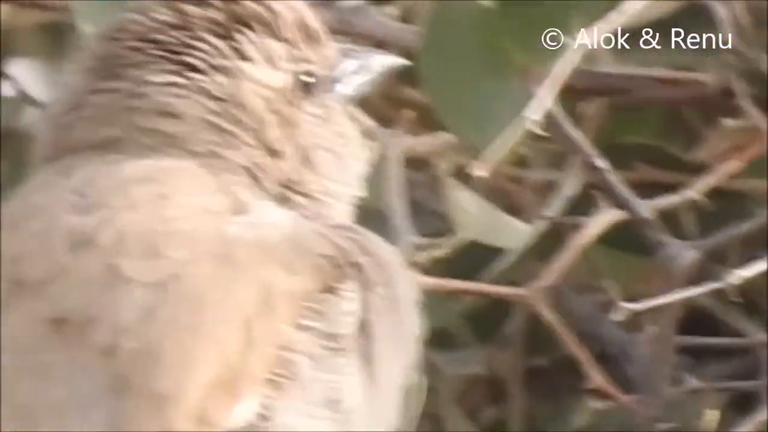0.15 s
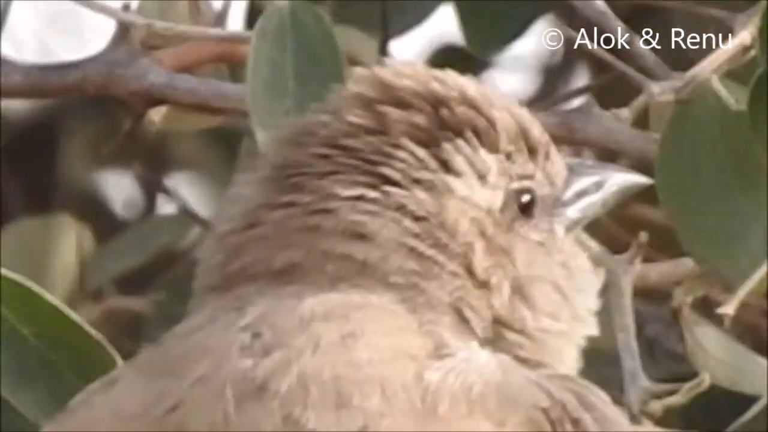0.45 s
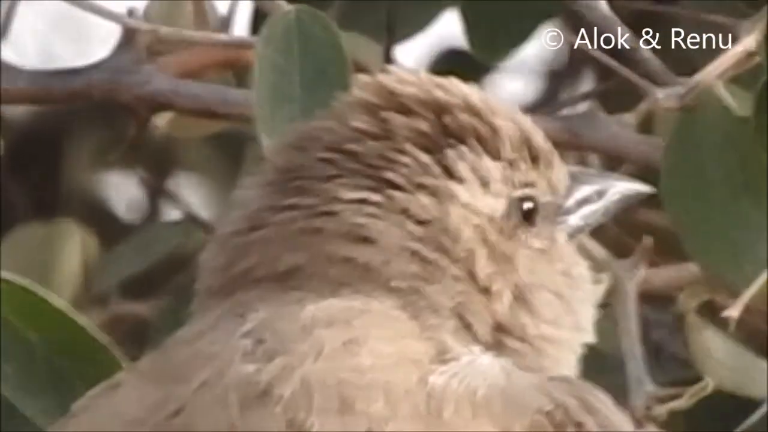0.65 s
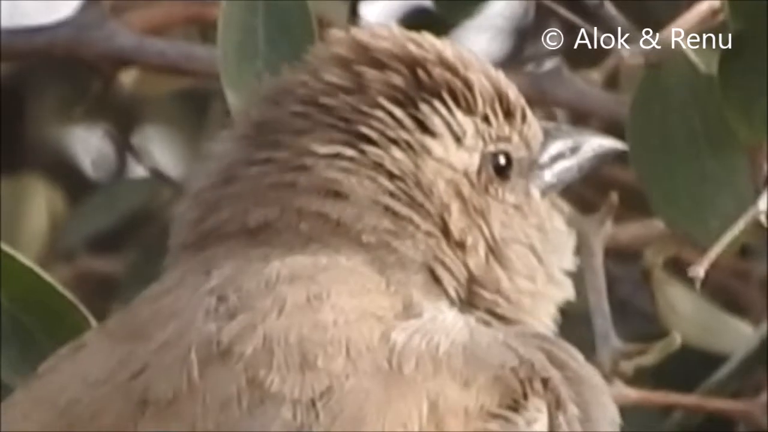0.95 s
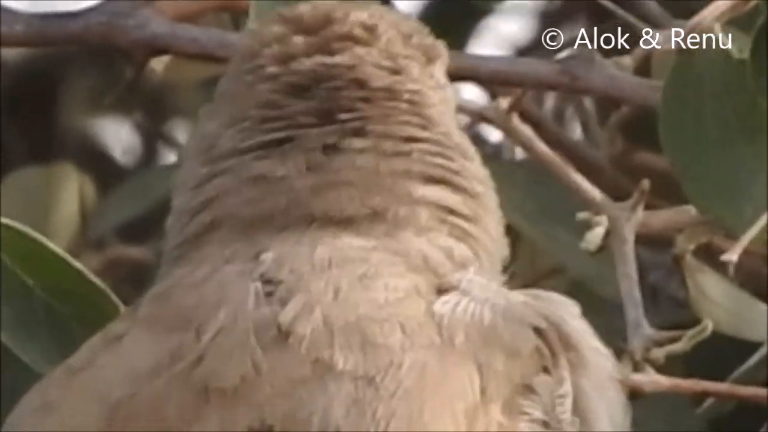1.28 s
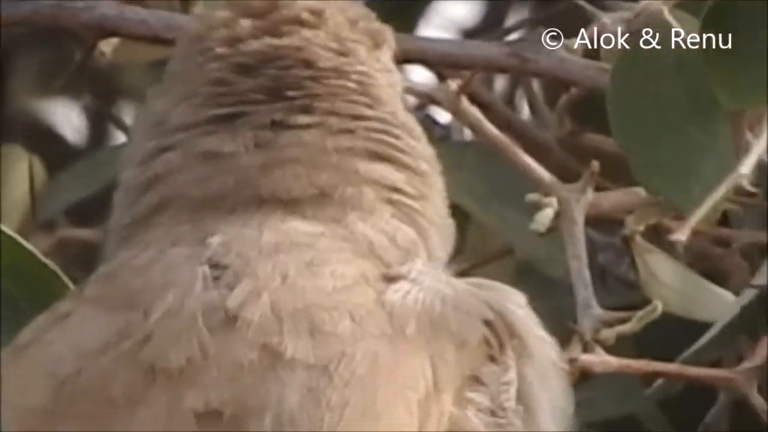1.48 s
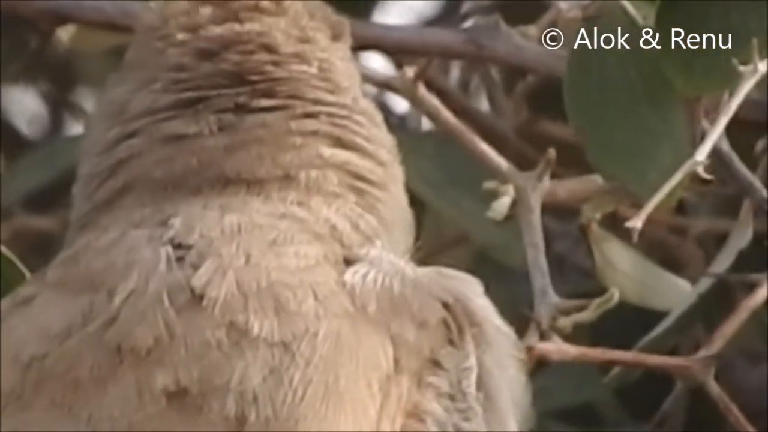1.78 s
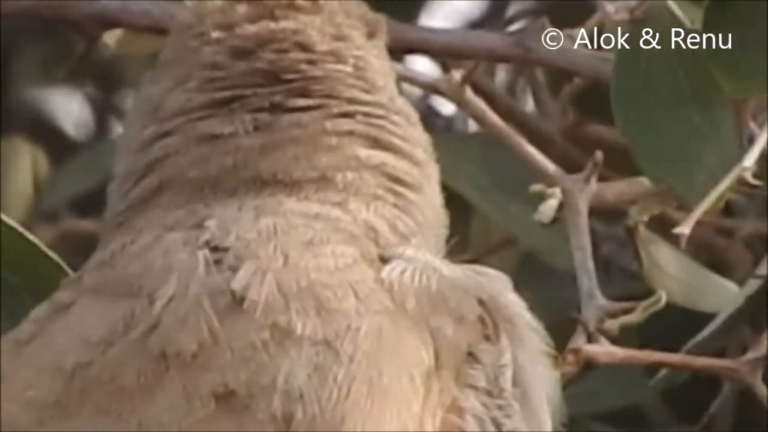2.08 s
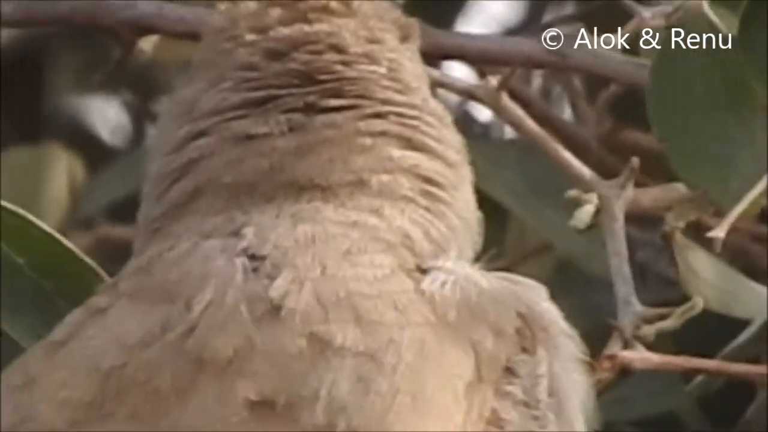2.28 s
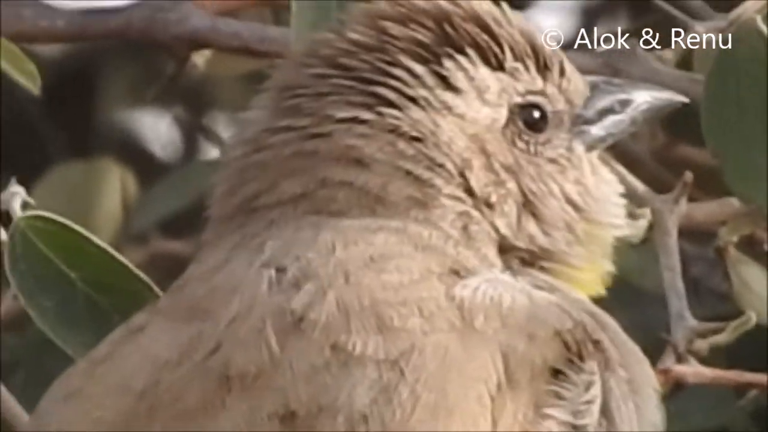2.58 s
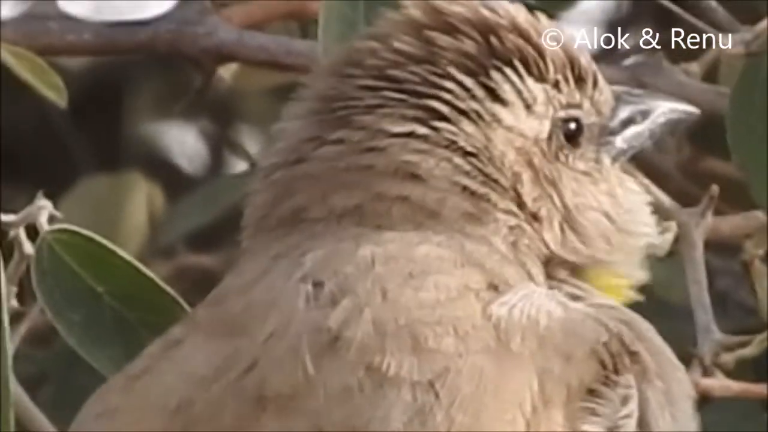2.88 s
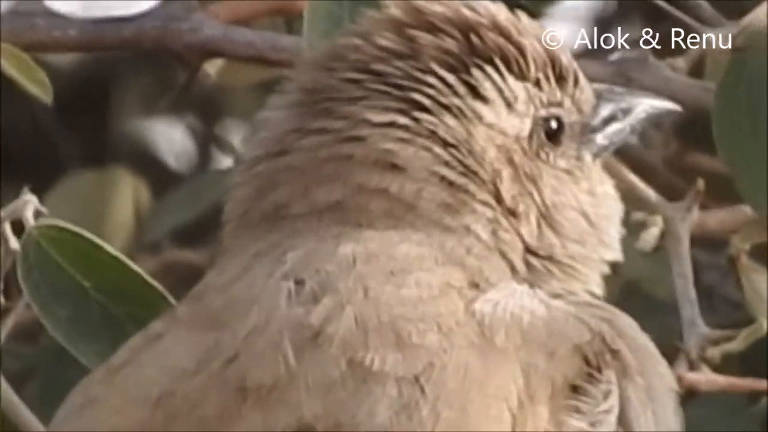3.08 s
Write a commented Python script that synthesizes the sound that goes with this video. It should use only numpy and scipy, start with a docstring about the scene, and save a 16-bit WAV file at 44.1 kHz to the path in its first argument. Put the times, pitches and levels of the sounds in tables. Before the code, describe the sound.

Bright, irregular sparrow chirps with quieter twitters and dry ticks, above soft air rumble outdoors

```python
"""A sparrow chirps straight ahead in a thorny bush: fast-swooping whistled notes, loud and soft, and a few dry ticks.
The notes are gliding tones with a weak octave and a noisy rasp; hoarse scratches and ticks are shaped noise.
Twigs and ground throw back brief reflections, built as scattered echoes and a faint tail of noise.
Behind the bird are distant calls (narrow bands of noise), an engine-like hum (three low tones),
and coloured noise for a soft rumble of air, a distant wash, a passing rustle, outdoor hiss and the microphone."""
import sys
import numpy as np
from scipy import signal
from scipy.fft import rfft, irfft
from scipy.io import wavfile
from scipy.ndimage import uniform_filter1d

SR = 44100
rng = np.random.default_rng(int(sys.argv[2]) if len(sys.argv) > 2 else 0)


def digitize_waveform(pressure):
    """Quantize a signal to 16-bit integers and store it at the path in sys.argv[1].

    Rows of a 2-D input are taken as channels; values are limited to [-1, 1].
    """
    field = np.atleast_2d(pressure).T
    bounded = np.clip(field, -1, 1)
    quanta = np.round(bounded * 32767).astype(np.int16)
    wavfile.write(sys.argv[1], SR, quanta)


N = 143325
T = np.arange(N) / SR   # time in s
FLUTTER_PER_S = 9.7     # pace of the level wander in rumble, wash and rustle
ROUGH_PER_S = 200       # pace of the roughness in the bird's voice


def from_db(db):
    """Decibels to gain."""
    return 10 ** (np.asarray(db) / 20)


def rms_one(x):
    """Scale to unit power."""
    return x / np.sqrt(np.mean(x ** 2) + 1e-20)


def level(rows):
    """Gain over time from points of t/s, level/dB."""
    return from_db(np.interp(T, *np.transpose(rows)))


def at_hz(points, hz):
    """Read a table on a log-frequency axis."""
    f, value = np.transpose(points)
    return np.interp(np.log(hz), np.log(f), value)


def stretch(s, length):
    """A soft-edged gate centred on a moment."""
    return np.exp(-np.square(np.square(2 * (T - s) / length)))


def drift(rate):
    """Smooth random wander of spread 1: noise through two equal low-pass poles, after a second to settle."""
    r = np.exp(-2 * np.pi * rate / SR)
    wander = signal.lfilter([1], [1, -2 * r, r * r], rng.standard_normal(N + SR))
    return rms_one(wander[SR:])


def complex_drift(rate):
    """Two independent drifts as one complex wander; multiplying a tone by it blurs the tone into a band."""
    return drift(rate) + 1j * drift(rate)


def air_noise(colour, ripple_db=1.8):
    """Stereo noise of a given colour, rippled as by nearby reflections, most alike in both ears near 200 Hz."""
    # left-right likeness: [f/Hz, correlation]
    likeness = [(30, 0.27), (200, 0.87), (1200, 0.69), (3000, 0.36), (8000, 0.094)]
    hz = np.maximum(np.fft.rfftfreq(N, 1 / SR), 1)
    grid = np.arange(0, SR / 2, 130)   # ripple points in Hz
    in_range = (grid > 450) & (grid < 7000)
    ripple = ripple_db * np.interp(hz, grid, rng.standard_normal(len(grid)) * in_range)
    lowest, highest = colour[0][0], colour[-1][0]
    edges = np.minimum(1, np.minimum(hz / lowest, highest / hz)) ** 2   # falls away outside the table
    gain = from_db(at_hz(colour, hz) + ripple) * edges
    alike = np.clip(at_hz(likeness, hz), -1, 1)
    mid, side = rfft(rng.standard_normal((2, N)))
    common = np.sqrt(1 + alike) * mid
    opposed = np.sqrt(1 - alike) * side * [[1], [-1]]
    return rms_one(irfft(gain * (common + opposed), N))


def shifting_noise(colour, count=4):
    """Several differently tinted noises swell and fade on their own, so the colour keeps shifting."""
    flutter_db, ripple_db = 3.5, 5
    layers = [from_db(flutter_db * drift(FLUTTER_PER_S)) * air_noise(colour, ripple_db) for _ in range(count)]
    return rms_one(sum(layers))


def microphone_noise():
    """The microphone's own steady noise."""
    # spectrum: [f/Hz, relative density/dB per Hz]
    mic_colour = [(2000, -9), (8500, 0.5), (16000, -9)]
    return from_db(-63) * air_noise(mic_colour)


def outdoor_hiss():
    """Faint high noise of the open air, slowly changing in level."""
    # spectrum: [f/Hz, relative density/dB per Hz]
    hiss_colour = [(1700, -5.5), (5000, 6.5), (6600, 4), (8000, -5.5), (12000, -22)]
    # strength of the hiss: [t/s, level/dB]
    hiss_level = [(0, -61.5), (.25, -55), (2.4, -61.5), (3.25, -60)]
    return level(hiss_level) * air_noise(hiss_colour)


def air_rumble():
    """Soft, lumpy low noise of moving air, with a random flutter in its level."""
    # spectrum: [f/Hz, relative density/dB per Hz]
    rumble_colour = [(35, -10.5), (52, 3), (72, 3.5), (205, 2.5), (260, -10.5), (400, -34)]
    # strength about which the flutter moves: [t/s, level/dB]
    rumble_level = [(0, -51.5), (.3, -47), (.7, -48.5), (1.56, -47.5), (1.7, -54), (1.95, -46),
                    (3.25, -44.5)]
    flutter_db = 3
    return level(rumble_level) * from_db(flutter_db * drift(FLUTTER_PER_S)) * air_noise(rumble_colour)


def distant_wash():
    """Noise from far off, weak in the treble, its colour always shifting."""
    # spectrum: [f/Hz, relative density/dB per Hz]
    far_colour = [(290, 2), (450, -5), (850, -2.5), (1150, -9), (3000, -16.5)]
    # strength of the wash: [t/s, level/dB]
    far_level = [(0, -51.5), (.75, -51.5), (1.05, -55), (1.85, -55), (2.4, -61), (3.25, -59)]
    return level(far_level) * shifting_noise(far_colour)


def engine_hum():
    """Three low tones, as of a distant engine: the lowest steady, the others wavering round a steady core."""
    # tones: [f/Hz, level/dB, start t/s, waver as share of the core]
    hum_tones = [(122, -55, 1.9, 0), (187.5, -53, 0, 0.85), (219.7, -51, 0.012, 1)]
    waver_per_s, swell_s = 5.8, .15
    out = np.zeros(N)
    for hz, db, start, waver in hum_tones:
        swell = np.clip((T - start) / swell_s, 0, 1)
        wander = 1 + waver * complex_drift(waver_per_s)
        tone = rms_one(np.real(wander * np.exp(2j * np.pi * hz * T)))
        out += from_db(db) * swell * tone
    return out


def far_calls():
    """Faint notes of distant birds, blurred into narrow bands."""
    # calls: [centre t/s, length/s, f/Hz, width/Hz, level/dB]
    call_rows = [(1.237, 0.18, 3120, 45, -60), (1.883, 0.08, 3035, 450, -58.5)]
    out = np.zeros(N)
    for s, length, hz, width, db in call_rows:
        call = np.real(complex_drift(width) * np.exp(2j * np.pi * hz * T))
        out += from_db(db) * stretch(s, length) * call
    return out


def rustle():
    """A soft low rustle, such as feathers shifting, passing as noise of shifting colour."""
    # spectrum: [f/Hz, relative density/dB per Hz]
    rustle_colour = [(300, 1.5), (550, -7), (900, -12.5)]
    # strength of the rustle: [t/s, level/dB]
    rustle_level = [(1.58, -63), (1.64, -50.5), (1.9, -51), (2.45, -60.5)]
    return level(rustle_level) * shifting_noise(rustle_colour)


def bush(x, count=36):
    """Many small, quickly weakening reflections, each reaching the two ears a little apart, then a faint tail."""
    first_s, last_s, decay_s = 0.001077, 0.022, 0.0098   # delays before scatter
    ear_skew_s = .00005   # largest shift at each ear
    twig_db, tail_db, tail_t60_s = -4.5, -23.5, 0.26
    t = T[:SR // 2]
    early = np.zeros((2, len(t)))
    delays = np.linspace(first_s, last_s, count) * rng.uniform(.9, 1.1, count)
    skews = rng.uniform(-0.36, 1, count)
    signs = rng.choice([-1, 1], count)
    for delay, skew, sign in zip(delays, skews, signs):
        for ear, way in enumerate((-1, 1)):
            arrival = int((delay + way * skew * ear_skew_s) * SR)
            early[ear, arrival] += sign * np.exp(-delay / decay_s)
    tail = rng.standard_normal((2, len(t))) * from_db(-60 * t / tail_t60_s) * (t > first_s)
    response = from_db(twig_db) * rms_one(early) + from_db(tail_db) * rms_one(tail)
    response /= np.sqrt(len(t))   # unit energy for each part before its gain
    return signal.fftconvolve(x[None], response, axes=1)[:, :N]


def ticks():
    """Dry noise bursts of a few milliseconds, perhaps of bill or feathers, swelling and dying at once."""
    # bursts: [peak t/s, level/dB, rise/s, decay/s]
    tick_rows = [(.621, -46.5, 0.004, .009), (0.7019, -35, 0.00071, 0.003), (0.709, -36, 0.0022, 0.004),
                 (2.256, -42, 0.0065, 0.0084), (3.124, -32.5, 0.0017, 0.0058), (3.232, -33, 0.0027, 0.006)]
    # spectrum: [f/Hz, relative density/dB per Hz]
    tick_colour = [(500, -21), (1400, 2.5), (2400, -11.5), (4600, 9), (6600, 3.5), (16000, -32)]
    shape = np.zeros(N)
    for s, db, rise, decay in tick_rows:
        shape += from_db(db) * np.exp(-np.maximum((s - T) / rise, (T - s) / decay))
    return shape * air_noise(tick_colour)


def scratches():
    """In places the whistle breaks up into a hoarse, fluttering hiss."""
    # stretches: [centre t/s, length/s, level before flutter/dB]
    scratch_rows = [(0.138, 0.061, -49), (1.064, 0.03, -46), (1.085, 0.019, -42), (2.19, 0.05, -60)]
    # spectrum: [f/Hz, relative density/dB per Hz]
    scratch_colour = [(2500, -3), (4300, 8.5), (7000, 5), (8500, -22.5)]
    flutter_db = 4.3
    shape = sum(from_db(db) * stretch(s, length) for s, length, db in scratch_rows)
    return shape * from_db(flutter_db * drift(ROUGH_PER_S)) * air_noise(scratch_colour)


def song():
    """Each note is one gliding, slightly rough whistle with a weak octave and a rasp."""
    # sung notes, one list of points each: [t/s, f/Hz, level before shimmer and throb/dB]
    note_points = [
        [(.112, 4750, -50.5), (.119, 4180, -43), (.125, 4630, -48), (.129, 3970, -47), (.133, 5540, -51),
         (.142, 3800, -52)],
        [(.117, 2770, -55), (.125, 2760, -51), (.131, 4400, -48)],
        [(.132, 3440, -48), (.14, 2510, -48.5), (.146, 3700, -43)],
        [(.157, 2840, -49), (.162, 2570, -50.5), (.167, 3680, -42)],
        [(.175, 6100, -35), (.18, 5730, -50), (.184, 5960, -23.5), (.186, 5240, -39), (.192, 6300, -20.5),
         (.198, 7420, -53), (.203, 7450, -31), (.2085, 5940, -21.5), (.212, 5400, -30.5), (.219, 5170, -46)],
        [(.426, 3700, -45.5), (.436, 5430, -29), (.44, 6050, -26), (.444, 4780, -44), (.458, 4370, -38),
         (.468, 3750, -32.5), (.475, 3880, -30), (.479, 2950, -42.5)],
        [(.483, 3170, -40), (.487, 4000, -30), (.499, 5050, -42), (.504, 4230, -33), (.513, 3654, -30),
         (.526, 3484, -34.5), (.537, 3580, -44), (.543, 2680, -51)],
        [(1.045, 6870, -54), (1.05, 5610, -37), (1.053, 3680, -52), (1.056, 5040, -40), (1.061, 4800, -44),
         (1.065, 4070, -41), (1.069, 3140, -53)],
        [(1.052, 2580, -46.5), (1.062, 2510, -52)],
        [(1.077, 3600, -54), (1.081, 4350, -44), (1.088, 4030, -47), (1.096, 3460, -51)],
        [(1.373, 4100, -49.5), (1.386, 3477, -34), (1.394, 3330, -50)],
        [(1.428, 3200, -57), (1.432, 3330, -35.5), (1.436, 4530, -50)],
        [(1.435, 2540, -42.5), (1.445, 2880, -36.5), (1.464, 2790, -34), (1.471, 3060, -47), (1.479, 3020, -53)],
        [(1.7045, 5400, -31), (1.709, 7360, -39), (1.713, 7400, -45), (1.7178, 5810, -19), (1.72, 5000, -35),
         (1.725, 2830, -42.5)],
        [(1.729, 5860, -29), (1.7345, 5960, -18.5), (1.738, 5570, -27), (1.742, 6970, -35), (1.746, 7700, -37),
         (1.7515, 5800, -23), (1.754, 5360, -26.5), (1.757, 5440, -48)],
        [(1.738, 5100, -41), (1.743, 3260, -45)],
        [(1.754, 4900, -49), (1.76, 3600, -42)],
        [(2.174, 4930, -54), (2.188, 4390, -59), (2.192, 4050, -41.5), (2.196, 2620, -41.5)],
        [(2.196, 4300, -51), (2.2, 3130, -39), (2.204, 4300, -46), (2.211, 4530, -51), (2.2185, 3330, -34),
         (2.222, 3070, -51), (2.229, 2724, -38.5), (2.238, 2710, -41), (2.248, 3170, -45), (2.262, 2630, -42)],
        [(2.26, 3860, -43), (2.266, 3240, -38), (2.269, 3300, -51), (2.278, 2790, -69)],
        [(2.509, 3270, -58), (2.519, 3720, -63)],
        [(2.56, 2710, -53), (2.571, 3350, -45.5), (2.577, 4200, -52.5)],
        [(2.581, 2650, -49), (2.589, 2590, -35.5), (2.599, 2580, -50)],
        [(2.63, 2410, -42.5), (2.64, 4430, -53)],
        [(2.646, 2410, -42.5), (2.656, 3340, -44.5), (2.662, 3465, -37.5), (2.672, 2500, -59)],
        [(2.716, 2600, -51), (2.721, 3230, -55), (2.728, 3400, -50), (2.738, 2820, -53)],
        [(2.95, 5240, -46), (2.963, 5700, -31), (2.969, 6500, -46)],
        [(2.967, 2775, -41), (2.973, 4510, -31), (2.9765, 5650, -19.5), (2.981, 6450, -28),
         (2.987, 5560, -24.5), (2.995, 5250, -23), (3.002, 5280, -41), (3.006, 3720, -35), (3.009, 3200, -32)],
        [(3.012, 3120, -39), (3.016, 4090, -25), (3.022, 4860, -36), (3.032, 5460, -33.5), (3.037, 3940, -28),
         (3.043, 4030, -36), (3.047, 3370, -25), (3.052, 3430, -46), (3.06, 2550, -38)],
    ]
    # fast warbles: [centre t/s, length/s, rate/swings per s, depth/share of pitch]
    warble_rows = [(.5195, .038, 152, .06), (1.0875, .022, 290, .2)]
    pitch_jitter, shimmer_db, warble_swing_db = 0.011, -1, 3   # jitter as a share of pitch
    octave_db, rasp_db, rasp_per_s = -29.5, -28, 2000
    # the throat favours an overtone that falls here
    overtone_hz, overtone_width_hz, overtone_lift_db = 5900, 540, 9
    voice_band_hz = (2100, 8200)

    jitter, shimmer = drift(ROUGH_PER_S), drift(ROUGH_PER_S)
    rasp = complex_drift(rasp_per_s)   # noisy skirt round the whistle
    dips = [stretch(s, length) * np.cos(2 * np.pi * rate * (T - s)) for s, length, rate, _ in warble_rows]
    warble = -sum(dip * row[3] for dip, row in zip(dips, warble_rows))
    throb_db = warble_swing_db * sum(dips)   # loudest where the pitch dips
    out = np.zeros(N)
    for note in note_points:
        s, hz, db = np.transpose(note)
        s = np.sort(s)
        i = np.flatnonzero((T > s[0] - .01) & (T < s[-1] + .01))
        glide = uniform_filter1d(np.interp(T[i], s, hz), size=90)
        pitch = glide * (1 + pitch_jitter * jitter[i] + warble[i])
        sounding = 1. * ((T[i] > s[0]) & (T[i] < s[-1]))
        gate = uniform_filter1d(sounding, size=70)   # softens the note's ends
        effort = gate * from_db(np.interp(T[i], s, db) + shimmer_db * shimmer[i] + throb_db[i])
        turn = np.exp(2j * np.pi * np.cumsum(pitch) / SR)
        nearness = np.exp(-((2 * pitch - overtone_hz) / overtone_width_hz) ** 2)
        octave = from_db(octave_db + overtone_lift_db * nearness)
        whistle = turn + octave * turn ** 2
        out[i] += effort * np.real(whistle * (1 + from_db(rasp_db) * rasp[i]))
    voice_band = signal.butter(4, voice_band_hz, "band", fs=SR, output="sos")
    return np.sqrt(2) * signal.sosfilt(voice_band, out)   # root 2: a sine at its rms level


def scene():
    """The bird straight ahead, its reflections and the surroundings."""
    surroundings = microphone_noise() + outdoor_hiss() + air_rumble() + distant_wash() + engine_hum()
    surroundings = surroundings + far_calls() + rustle()
    bird = song()
    return surroundings + bush(bird) + ticks() + scratches() + bird


def record(dry):
    """The top is cut steeply by an elliptic low-pass at 15.8 kHz."""
    return signal.sosfilt(signal.ellip(10, .1, 70, 15800, fs=SR, output="sos"), dry)


dry = scene()
out = record(dry)
digitize_waveform(out)
```